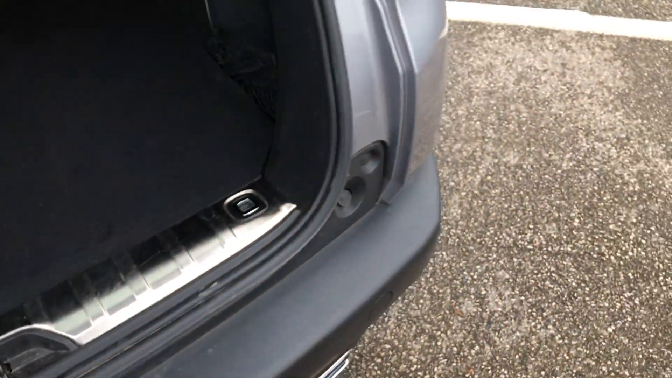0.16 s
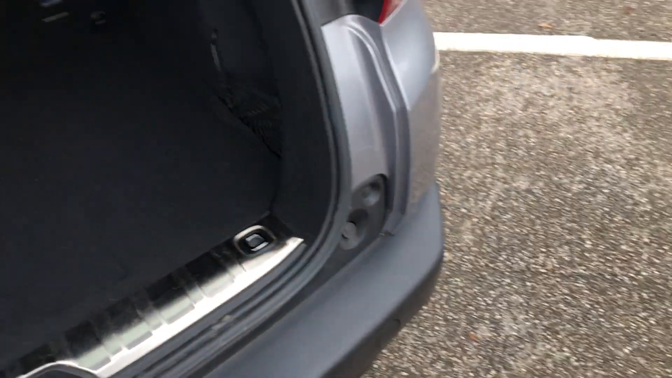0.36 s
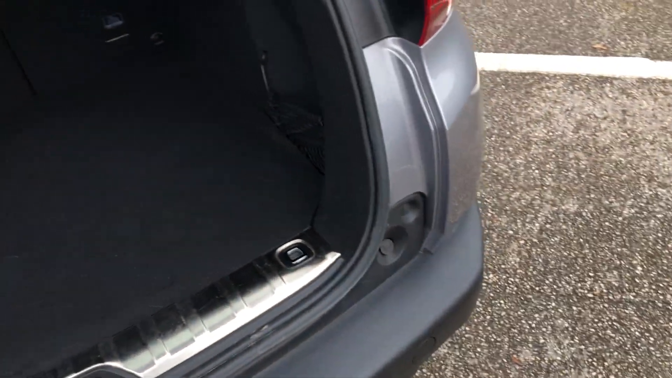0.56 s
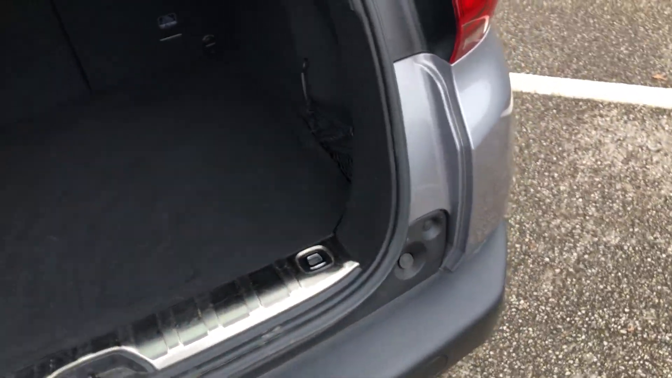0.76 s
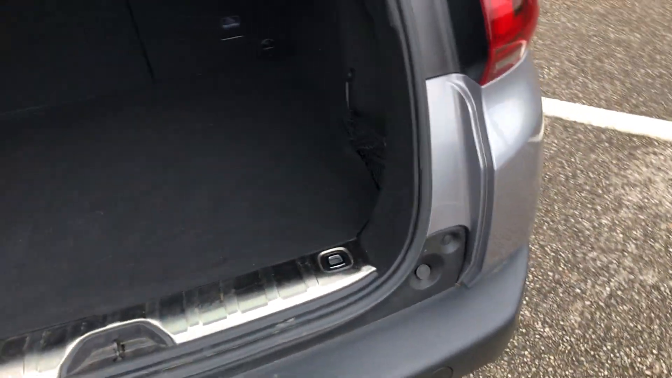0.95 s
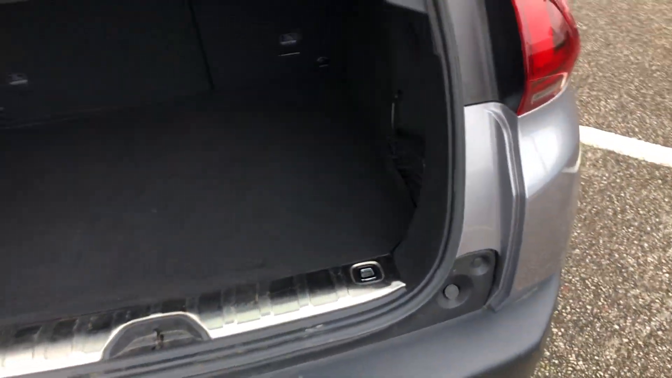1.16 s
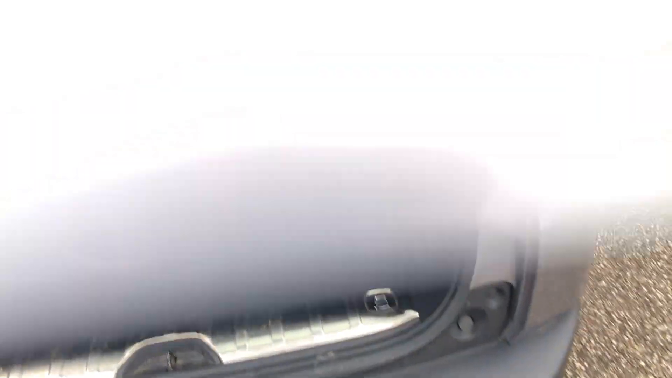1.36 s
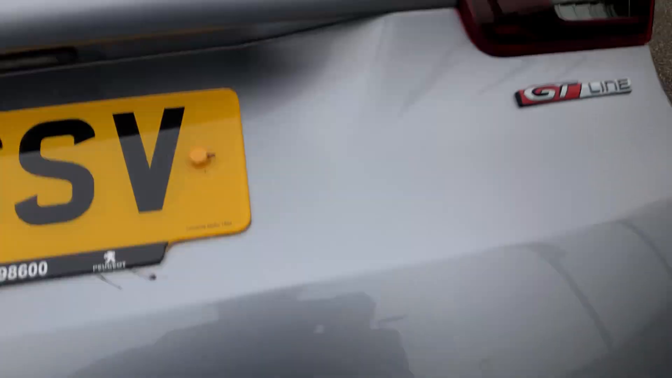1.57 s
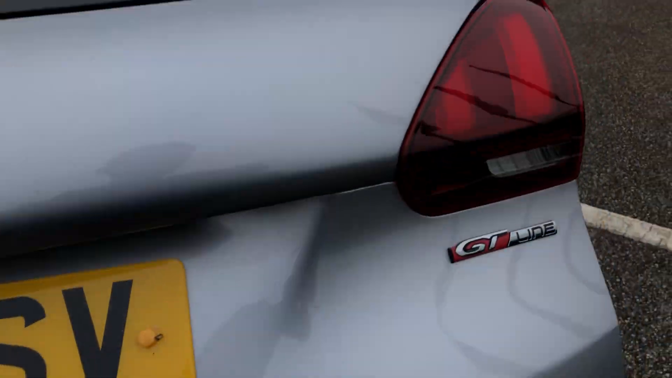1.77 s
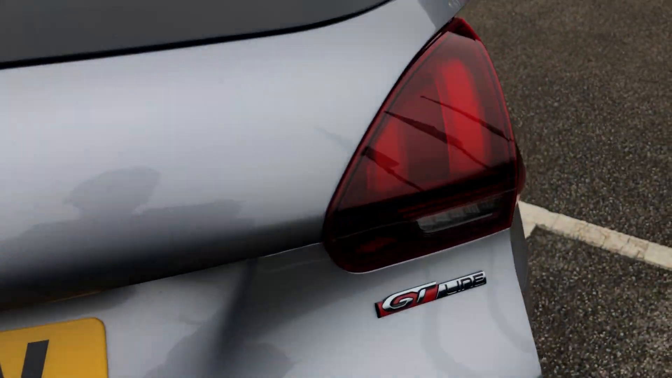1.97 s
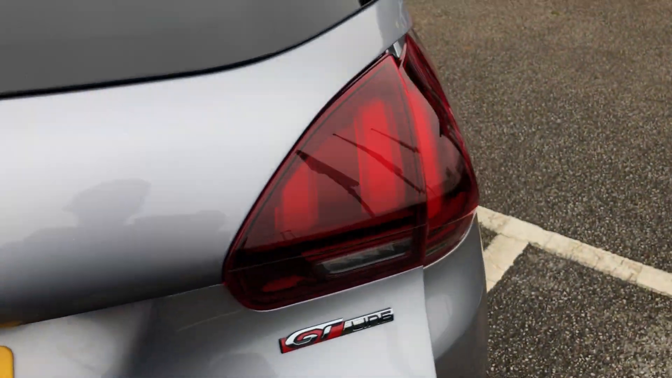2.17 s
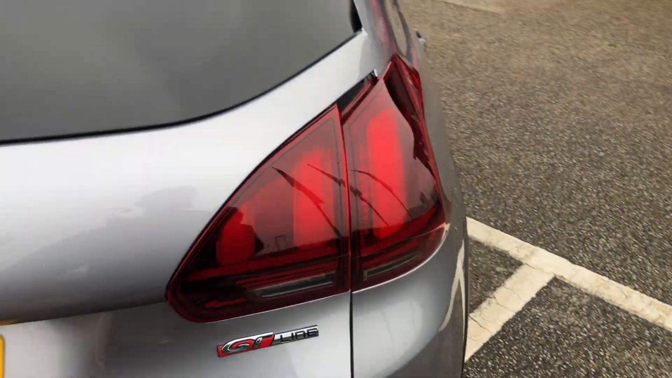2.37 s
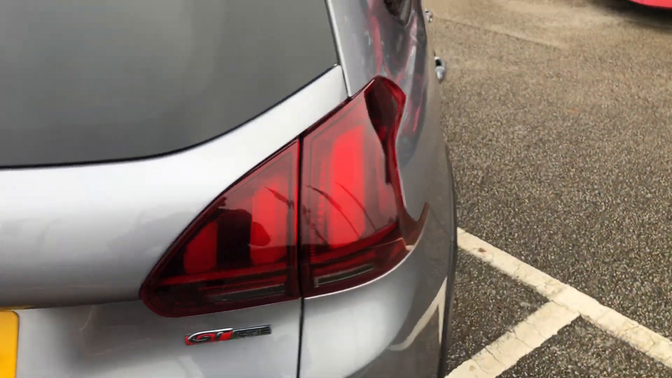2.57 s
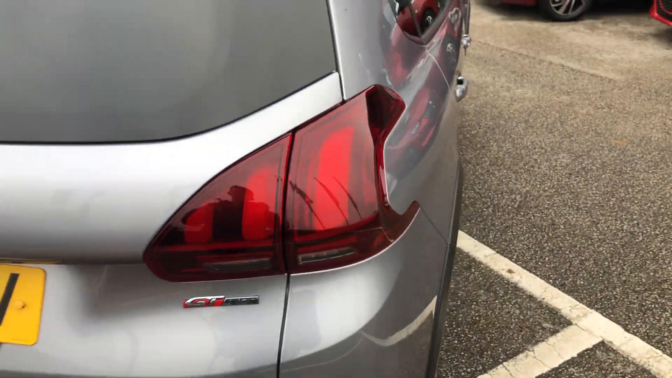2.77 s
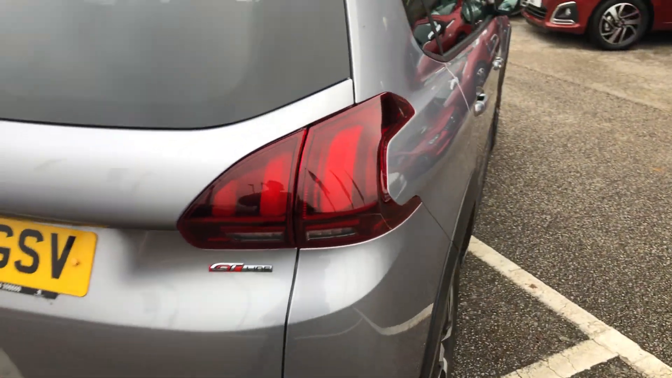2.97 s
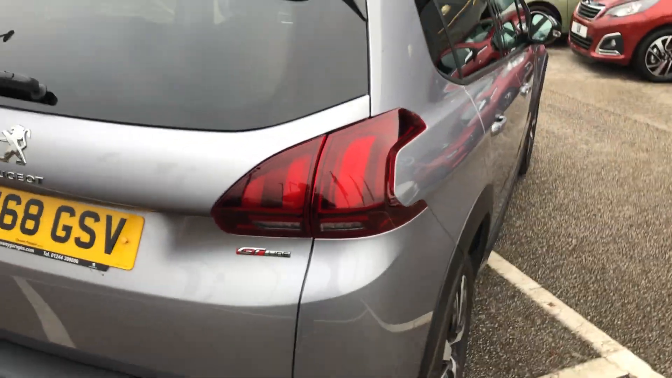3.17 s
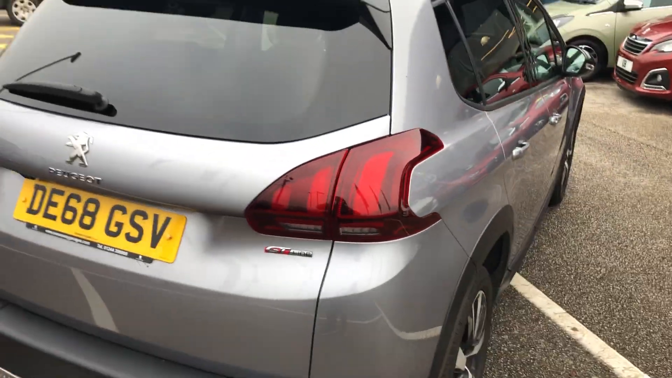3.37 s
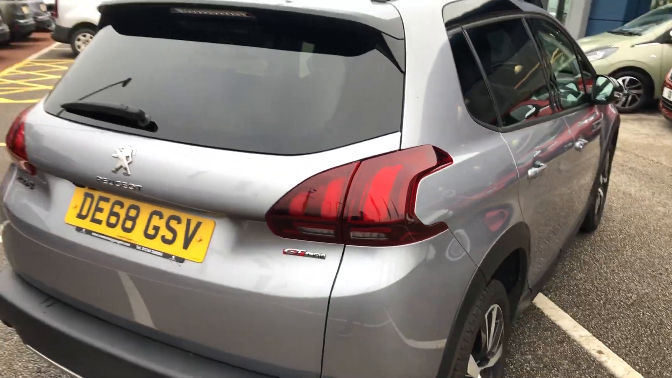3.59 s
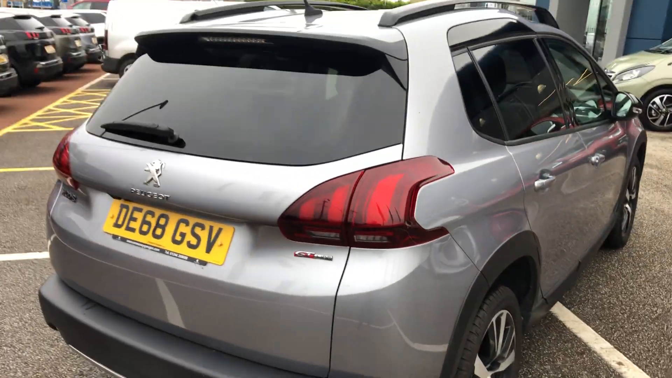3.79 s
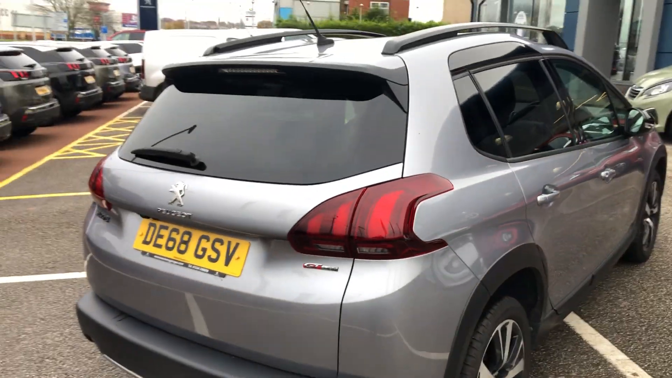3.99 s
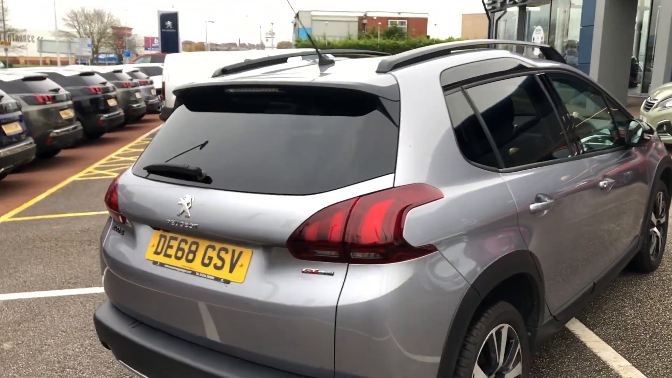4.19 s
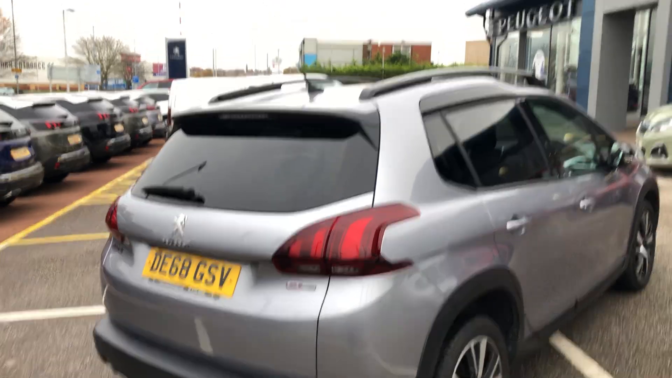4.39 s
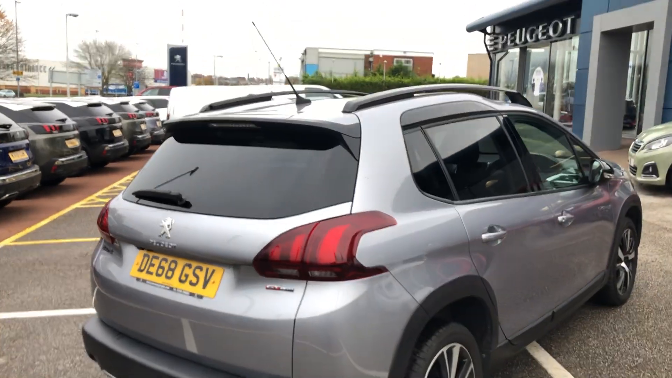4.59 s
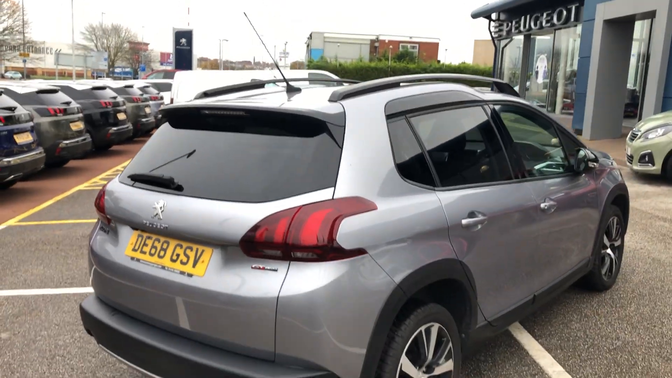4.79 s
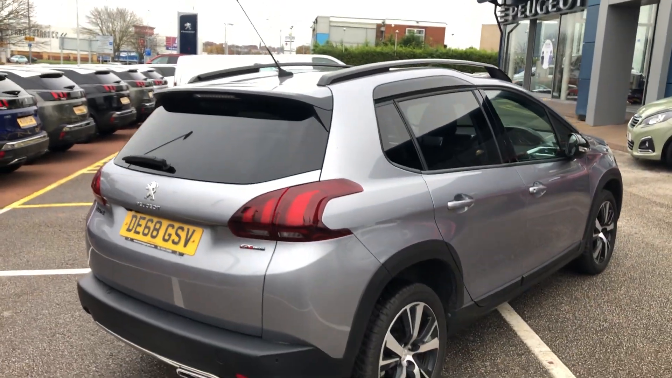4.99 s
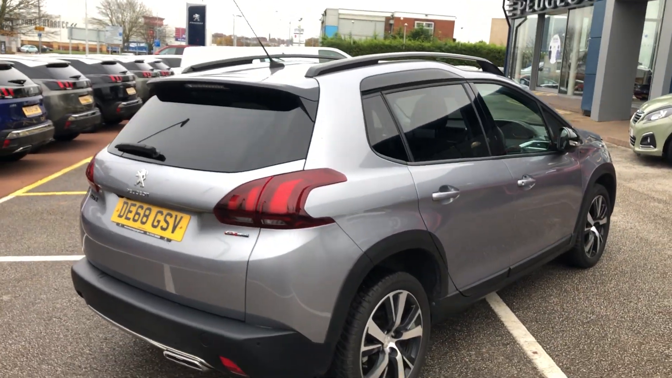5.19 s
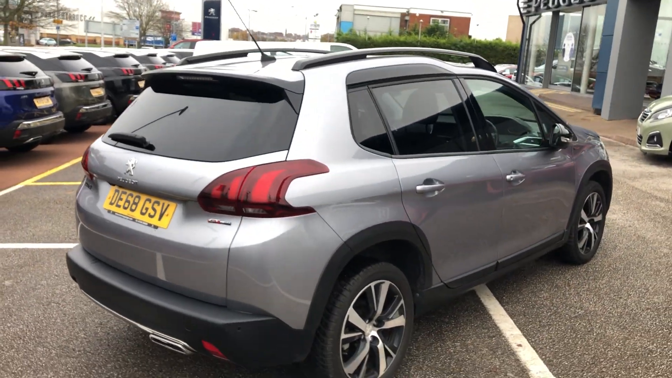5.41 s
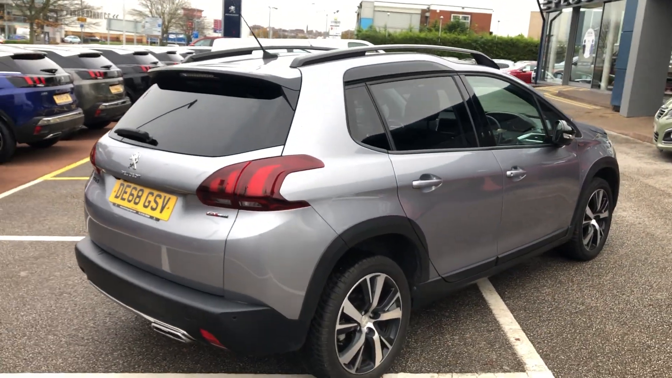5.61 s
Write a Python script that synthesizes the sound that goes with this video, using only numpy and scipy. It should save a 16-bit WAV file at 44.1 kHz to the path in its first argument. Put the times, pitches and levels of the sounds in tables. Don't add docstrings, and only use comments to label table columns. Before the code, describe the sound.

Close handheld perspective beside a hatchback: soft knocks and cloth movement, a thin airy hiss as the lid is pulled, low wind-like puffs, then one loud slam with metallic latch clatter and deep body boom. Afterwards gritty steps tick nearby, while steady road rumble and a very faint, spurting air leak continue.

```python
import sys
import numpy as np
from scipy import signal
from scipy.fft import rfft, irfft
from scipy.io import wavfile
from scipy.ndimage import uniform_filter1d

SR = 44100
rng = np.random.default_rng(int(sys.argv[2]) if len(sys.argv) > 2 else 0)


def output_pcm(signal):
    pcm = np.clip(np.atleast_2d(signal).T, -1, 1) * 32767
    wavfile.write(sys.argv[1], SR, np.round(pcm).astype(np.int16))


def natural_amplitude(level_db):
    exponent = np.asarray(level_db, float) / 20
    return 10 ** exponent


N = 249165
STEP_BACK_S = 3.05


def colour_gain(f, points):
    hz, db = np.transpose(points)
    return natural_amplitude(np.interp(np.log(f), np.log(hz), db))


def shaped(points):
    hz, db = np.transpose(points)
    f = np.maximum(np.fft.rfftfreq(N, 1 / SR), 1)
    gain = natural_amplitude(np.interp(np.log(f), np.log(hz), db, left=-90))
    x = irfft(rfft(rng.standard_normal(N)) * gain, N)
    return x / x.std()


def lowpass(x, order, hz):
    return signal.lfilter(*signal.butter(order, hz, fs=SR), x)


def band(x, hz, width):
    quality = max(hz / width, .3)
    return signal.lfilter(*signal.iirpeak(min(hz, .4 * SR), quality, fs=SR), x)


def walk(rate):
    hold = int(SR / rate)
    x = np.repeat(rng.standard_normal(N // hold + 1), hold)
    x = uniform_filter1d(uniform_filter1d(x, hold), hold)[:N]
    return x / x.std()


def curves(table):
    s, *columns = np.transpose(table)
    return [np.interp(np.arange(N) / SR, s, column) for column in columns]


def swells(rows):
    s, db, rise, fall = np.transpose(rows)[:, :, None]
    steps = np.arange(0, N / SR + .002, .002)
    t = steps - s
    drop_db = 20 * np.where(t < 0, -t / rise, t / fall)
    level = np.sqrt(np.sum(natural_amplitude(db - drop_db) ** 2, axis=0))
    return np.interp(np.arange(N) / SR, steps, level)


def burst(hold_ms, t60_ms):
    t = np.arange(SR // 4) / SR * 1000
    return np.minimum(t / 0.1, 1) * natural_amplitude(-60 * np.maximum(t - hold_ms, 0) / t60_ms)


def add(out, x, s):
    i = int(s * SR)
    out[i:i + len(x)] += x[:N - i]


def whistle(hz, width):
    noise = rng.standard_normal(N) + 1j * rng.standard_normal(N)
    sway = signal.sosfilt(signal.butter(2, width / 2, fs=SR, output="sos"), noise)
    x = np.real(sway * np.exp(2j * np.pi * np.cumsum(hz) / SR))
    return x / x.std()


def rubs(table, grain_db, snap_ms, linger, longest_ms):
    out = np.zeros(N)
    noises = rng.standard_normal((len(table), 2, SR // 4))
    for (s, db, low_hz, high_hz, rub_ms), (noise, grain) in zip(table, noises):
        edges = [low_hz, np.clip(high_hz, 1.2 * low_hz, .45 * SR)]
        t60_ms = min(snap_ms + linger * rub_ms, longest_ms)
        x = noise * natural_amplitude(grain_db * grain) * burst(rub_ms, t60_ms)
        x = signal.lfilter(*signal.butter(2, edges, "bandpass", fs=SR), x)
        x = lowpass(x, 1, min(0.86 * low_hz, .45 * SR))
        add(out, natural_amplitude(db) * x / np.abs(x).max(), s)
    return out


def rings(table):
    out, t = np.zeros(N), np.arange(SR) / SR
    for s, db, hz, t60, cycles in table:
        push = np.sin(np.pi / 2 * np.minimum(t * hz / cycles, 1)) ** 2
        add(out, natural_amplitude(db - 60 * t / t60) * push * np.sin(2 * np.pi * hz * t), s)
    return out


def traffic():
    # (time [s], tyre roar [dB])
    road = [
        (0, -53.5),
        (.5, -54.5),
        (1.15, -53.5),
        (2.0, -54.5),
        (2.5, -54.5),
        (3.4, -53),
        (4.3, -52.5),
        (4.5, -51.5),
        (5.65, -51),
    ]
    # (frequency [Hz], density [dB per Hz])
    roar_colour = [(76, -30), (130, -1.5), (150, -0.5), (337, -3.5), (396, -7.5), (643, -8), (742, -9),
                   (904, -4), (1140, -8.5), (1610, -11), (6630, -40.5), (8080, -38), (9500, -46),
                   (12400, -78), (20900, -120)]
    # (frequency [Hz], density [dB per Hz])
    rumble_colour = [(20, -40), (32, -10), (50, 13), (70, 7), (110, 5), (160, -12.5), (260, -41)]
    # (time [s], peak [dB], rise [s for 20 dB], fall [s for 20 dB])
    engines = [(0, -48, 1, .5), (.3, -50, .2, .6), (.62, -51, .2, 1.5), (1.3, -50, .4, 1.2),
               (1.78, -50, .6, .3), (2.0, -52, .1, .1), (2.38, -52, .6, .3), (2.95, -50, 1.2, .4),
               (3.4, -49, .5, 1.2), (4.11, -50.5, .6, .3), (4.48, -47, .5, 1.2), (4.97, -46, .2, .5),
               (5.55, -47, 2.6, 1)]
    idle_db, flicker_db = -57.5, .8
    roar_db, = curves(road)
    centres = 100 * 2 ** np.arange(0, 8, .5)
    f, spectrum = np.fft.rfftfreq(N, 1 / SR), rfft(shaped(roar_colour))
    roar = np.zeros(N)
    for row in np.eye(len(centres)):
        part = irfft(spectrum * np.interp(f, centres, row), N)
        roar += natural_amplitude(flicker_db * walk(7.1)) * part
    rumble = np.hypot(swells(engines), natural_amplitude(idle_db)) * shaped(rumble_colour)
    return natural_amplitude(roar_db + 4) * roar + rumble


def strut_flow():
    # (time [s], flow [dB], whistle [Hz], upper whistle [Hz])
    flow = [
        (0.878, -90, 7500, 10000),
        (0.97, -67, 7700, 10100),
        (1.03, -61.5, 8200, 10400),
        (1.085, -60, 8600, 10900),
        (1.186, -57, 7800, 11400),
        (1.27, -60, 7500, 11700),
        (1.38, -64, 7900, 11700),
        (1.516, -69, 8000, 11500),
        (1.76, -73, 7600, 11000),
        (1.88, -88, 7500, 11000),
    ]
    flow_db, low_hz, top_hz = curves(flow)
    moving = np.arange(N) / SR < flow[-1][0]
    return natural_amplitude(flow_db) * moving, low_hz, top_hz


def gas_whistles(flow, strut_hz, strut_top_hz):
    # (time [s], peak [dB], fall [s for 20 dB])
    spurts = [(2.14, -72, .2), (2.5, -73, .9), (3.14, -68, .25), (3.4, -71, .3), (3.67, -69, .25),
              (3.9, -68.5, .4), (4.18, -66, .35), (4.45, -66, 1.2), (4.77, -67, .9), (5.05, -66, 1.2),
              (5.25, -66, 1.2), (5.42, -65, .9)]
    # (time [s], peak [dB], fall [s for 20 dB])
    answers = [
        (2.14, -73, .2),
        (4.0, -74, .3),
        (4.3, -72, .3),
        (4.58, -76, .3),
        (4.93, -72, .5),
        (5.22, -72, .6),
        (5.5, -69.5, .6),
    ]
    rise_s, leak_hz, leak_top_hz = .15, 7950, 10900
    sag_hz_per_s, sag_from_s = -300, 4.2
    pull_s, top_fade_db_per_s = 1.04, -35
    t = np.arange(N) / SR
    pulled, near = np.maximum(t - pull_s, 0), t < STEP_BACK_S
    sag_hz = sag_hz_per_s * np.maximum(t - sag_from_s, 0)
    low_hz = np.where(near, strut_hz, leak_hz + sag_hz)
    top_hz = np.where(near, strut_top_hz, leak_top_hz + 1.5 * sag_hz)
    leak = swells([(s, db, rise_s, fall) for s, db, fall in spurts])
    leak_top = swells([(s, db, rise_s, fall) for s, db, fall in answers])
    low = np.hypot(natural_amplitude(4.6 - 5.1 * pulled) * flow, leak)
    top = np.hypot(natural_amplitude(2.6 + top_fade_db_per_s * pulled) * flow, leak_top)
    low = low * natural_amplitude(-5.5 + 2.5 * walk(40)) * whistle(low_hz + 70 * walk(20), 850)
    top = top * natural_amplitude(-4.4 + 2.1 * walk(28)) * whistle(top_hz + 150 * walk(11), 1200)
    return low + top


def cloth_and_rush(flow):
    # (frequency [Hz], density [dB per Hz])
    fine_colour = [(4000, -25), (6000, -8), (9000, -5), (13000, -5), (16000, -3)]
    # (time [s], peak [dB], rise [s for 20 dB], fall [s for 20 dB], coarse over fine [dB])
    moves = [(.1, -66, 2, .3, -1), (1.23, -70, .3, .3, 6), (1.58, -69, .5, .2, -4),
             (1.66, -75, .15, .15, 12), (1.92, -70, .06, .3, -5), (2.12, -70, .5, .2, 8.5),
             (2.45, -76, .15, .15, 11), (2.75, -72, .3, .6, 1), (2.93, -70, .3, .15, 3),
             (3.34, -73, .1, .08, 3), (3.2, -84, .3, .2, 9), (3.72, -75.5, .25, .2, -3),
             (4.4, -84, .3, .3, 10), (5.5, -85, .4, .6, 11)]
    stir_db, step_back_db, lot_hiss_db, rush_db = -76, -24, -72, -1
    t = np.arange(N) / SR
    stir = natural_amplitude(stir_db + step_back_db * np.clip((t - STEP_BACK_S) / .2, 0, 1))
    fine = swells([row[:4] for row in moves])
    fine = np.sqrt(fine ** 2 + stir ** 2 + (natural_amplitude(rush_db) * flow) ** 2)
    rough = swells([(s, db + over_db, rise, fall) for s, db, rise, fall, over_db in moves])
    rough = np.hypot(rough, natural_amplitude(lot_hiss_db))
    coarse = band(band(rng.standard_normal(N), 3830, 3200), 3830, 3200)
    coarse = lowpass(coarse, 2, 9500)
    rustle = natural_amplitude(5.5) * fine * shaped(fine_colour) + natural_amplitude(2.5) * rough * coarse / coarse.std()
    return natural_amplitude(0.89 * walk(40)) * rustle


def hiss():
    flow, strut_hz, strut_top_hz = strut_flow()
    return gas_whistles(flow, strut_hz, strut_top_hz) + cloth_and_rush(flow)


def hands_and_shoes():
    # (time [s], peak
    # [dB], low edge [Hz], high edge [Hz])
    tick_table = [(.538, -45.5, 5000, 16000), (.665, -56, 9000, 16000), (.784, -54, 3000, 5500),
                  (2.172, -46, 1990, 6040), (2.21, -50, 4500, 10000), (2.217, -48.5, 4400, 5600),
                  (2.227, -51, 7000, 16000), (2.43, -60, 5000, 10100), (2.4415, -50, 6000, 14000),
                  (2.445, -52, 3000, 8000), (2.689, -45, 5000, 16000), (2.701, -45, 5000, 16000),
                  (2.9705, -46, 3000, 7000), (2.972, -54, 5000, 15000), (3.319, -46, 2000, 11000),
                  (3.338, -48, 2500, 15000), (3.357, -48, 4500, 10000), (3.459, -55, 3000, 14000),
                  (3.576, -58, 8000, 15000), (.207, -54, 4000, 9000), (.207, -56, 12000, 16000),
                  (.543, -52, 4000, 11000), (3.312, -44, 3200, 5500), (3.338, -46, 3200, 6000),
                  (2.246, -55, 5000, 6000)]
    # (time [s], peak [dB], low edge [Hz], high edge [Hz], rub [ms])
    scuffs = [(.533, -39, 890, 3200, 8.9), (.54, -38, 247, 670, 20), (.827, -44, 2400, 15000, 7.4),
              (1.088, -36.5, 396, 3300, 26), (1.122, -33.5, 520, 2870, 18), (1.45, -36, 90, 457, 206),
              (2.13, -39, 198, 496, 42), (2.23, -41, 300, 900, 18), (1.91, -56, 13500, 16000, 60),
              (2.03, -58, 13500, 16000, 140), (2.246, -48, 11000, 16000, 4.6),
              (2.924, -44, 4500, 12000, 3.5), (3.19, -58, 8600, 14800, 4.6), (3.299, -38, 400, 2200, 46),
              (1.29, -43, 200, 420, 90), (3.333, -33, 308, 1400, 4.2), (3.31, -57, 12000, 16000, 35),
              (3.626, -53, 11000, 16000, 23)]
    # (time [s], peak [dB], pitch [Hz], t60 [s], push
    clicks = [(.536, -37.5, 1310, 0.025, 1.8), (1.128, -36, 1400, .05, 3), (1.138, -41, 1140, 0.14, 4.4),
              (2.2822, -36, 3420, 0.01, .5), (2.283, -35, 2660, 0.0093, .5), (3.2995, -33, 890, 0.032, .8),
              (3.3125, -26, 1100, 0.01, .6), (3.3122, -45, 4200, .01, .6), (3.319, -35.5, 743, .06, 1.2),
              (3.3195, -40, 2700, .008, 1.5), (3.3335, -35, 2820, 0.009, 1.5),
              (3.34, -26, 850, 0.015, 0.59), (3.347, -29, 1650, 0.012, 1), (3.3567, -29, 2900, 0.008, 1.5),
              (3.358, -20, 910, 0.013, 1.5), (3.381, -45, 2900, .012, .8), (3.382, -34, 950, 0.025, 0.64),
              (4.319, -43, 3400, 0.009, .6), (4.321, -30, 450, 0.013, .4), (1.086, -42, 820, .03, 1.5),
              (1.094, -48, 3900, .02, 3), (1.097, -43, 1950, .02, 2), (1.11, -43, 1250, .02, 2),
              (1.123, -41, 2050, .03, 3), (1.126, -44, 2650, .08, 6), (1.133, -40, 2000, .025, 2),
              (1.133, -41, 750, .04, 2), (1.142, -42, 500, .06, 2), (3.304, -39, 1400, .025, 2),
              (3.309, -36, 950, .02, 1), (3.325, -37, 620, .05, 1.5), (3.334, -35, 500, .02, .8),
              (.531, -46, 2700, .03, 4), (.5362, -35, 1700, .012, .5), (2.1735, -45, 2350, .015, 2),
             (2.2825, -42, 5000, .005, 1), (2.4393, -43, 4500, .005, .5), (2.4418, -38, 5000, .008, .5),
             (2.4418, -43, 8000, .008, 1), (2.4425, -45, 3200, .01, 1), (2.4579, -30, 1600, .009, 1),
             (2.458, -44, 3000, .006, .5), (2.458, -50, 5500, .005, 1), (2.9218, -42, 1500, .004, .4),
             (2.927, -45, 4900, .015, 4), (2.9703, -37, 1550, .012, 1), (2.9728, -36, 3300, .007, .5),
             (2.9745, -46, 3900, .015, 2), (2.975, -50, 6300, .01, 3), (1.63, -55, 4200, .1, 20),
             (1.645, -52, 4000, .06, 10)]
    tick_ms = 1.6
    table = scuffs + [(*row, tick_ms) for row in tick_table]
    return rings(clicks) + rubs(table, grain_db=0.5, snap_ms=16, linger=3.6, longest_ms=75)


def puffs(droop=0.26):
    # (time [s], peak [dB], swing [Hz], length [cycles])
    reach = [
        (.551, -39, 173, 1.3),
        (0.557, -35, 172, 1.2),
        (0.591, -43, 250, 2),
        (0.811, -42, 302, 3.3),
        (0.901, -41, 196, 5),
        (.96, -39, 220, 2),
        (1.10, -40.5, 163, 3.6),
    ]
    # (time [s], peak [dB], swing [Hz], length [cycles])
    swing = [ (1.44, -34, 143, 1.4), (1.467, -32, 151, 1.3), (1.504, -30.5, 248, 2.3),
             (1.533, -40, 180, 1.4), (1.555, -22.5, 195, 1.5), (1.567, -31, 300, 1.2),
             (1.573, -24.5, 117, 1.6), (1.601, -25.5, 196, 2.7), (1.601, -30, 460, 5.4),
             (1.619, -29, 143, 3), (1.649, -30, 111, 2.1), (1.6, -37, 60.4, 3.4), (1.689, -38, 91, 2.2),
             (1.76, -37, 147, 2.4), (1.838, -40, 135, 2)]
    # (time [s], peak [dB], swing [Hz], length [cycles])
    push = [
        (2.166, -35, 158, 1.2),
        (2.183, -32.5, 83, 1.8),
        (2.204, -36, 131, 2.7),
        (2.225, -38, 120, 1.8),
        (2.241, -40.5, 326, 5.9),
        (2.349, -43, 70, 3.2),
        (3.19, -42, 264, 4.6),
        (3.459, -38.5, 232, 3.3),
        (4.449, -46.5, 99, 2.1),
        (4.95, -50, 200, 3),
    ]
    out, eddies = np.zeros(N), reach + swing + push
    for (s, db, hz, cycles), turn in zip(eddies, rng.random((len(eddies), 1))):
        u = np.arange(-1.5, 1.5, hz / cycles / SR)
        swings = cycles * (u - droop * u ** 2) + turn
        x = natural_amplitude(db) * np.exp(-4 * u ** 2) * np.cos(2 * np.pi * swings)
        add(out, x, s - 1.493 * cycles / hz)
    return out


def latch_and_panel():
    # (time [s], strength [dB], chatter [ms], fade t60 [ms], dull above [Hz])
    contacts = [
        (2.5705, -29, 1.8, 26, 6000),
        (2.5693, -20.5, 11, 33, 1410),
        (2.581, -12, 5.7, 5.6, 5800),
        (2.587, -16, 10.7, 34, 11800),
        (2.602, -23.5, 9.3, 82, 5160),
        (2.628, -28.5, 13, 57, 2840),
        (2.648, -36, 5.3, 110, 4000),
        (2.685, -42, 22, 55, 9700),
    ]
    # (pitch [Hz], level [dB], t60 [s])
    metal = [(512, 1, .05), (811, 9, 0.045), (877, 4, 0.055), (1013, 8.5, 0.023), (1100, -8, 0.093),
             (1316, -6, 0.046), (1715, -5, 0.056), (2005, -3, 0.049), (2340, -6, .04), (2630, -4, .04),
             (3200, -7, .04), (3630, -12, 0.038), (4440, -12, 0.033)]
    # (frequency [Hz], gain [dB])
    sizzle = [(700, -14), (1300, -8), (2000, -3), (4000, -3.5), (5200, -15), (6500, -19), (9500, -15),
              (13000, -11), (16000, -5)]
    # (time [s], peak [dB], pitch [Hz], t60
    # [s], push [cycles])
    booms = [(2.5703, -25, 1020, 0.014, 0.3), (2.585, -12, 275.7, 0.11, 0.81), (2.599, -12, 63.5, .15, .17),
             (2.6148, -19, 66, .08, .4), (2.584, -23, 505, .07, 1.5), (2.586, -24, 392, .08, 1.5),
             (2.583, -19, 830, .07, 1.5), (2.655, -28, 95, .2, 1.2), (2.68, -29, 72.8, 0.69, 6.3),
             (2.5705, -22, 1300, .008, .4), (2.5755, -25, 900, .012, .5), (2.594, -38, 9500, .02, 8),
             (2.601, -26, 3700, .05, 4), (2.5875, -22, 3800, .012, 2), (2.608, -26, 420, .08, 2),
             (2.628, -16, 300, .018, .4), (2.64, -30, 300, .08, 2), (2.665, -33, 185, .3, 2),
             (2.692, -31, 335, .1, 3), (2.695, -36, 480, .06, 3), (2.725, -35, 88, .3, 1.5),
             (2.79, -42, 190, .2, 2), (2.885, -41, 280, .08, 2)]
    force = np.zeros(N)
    noises = rng.standard_normal((len(contacts), 2, SR // 4))
    for (s, db, hold_ms, t60_ms, dull_hz), (noise, grain) in zip(contacts, noises):
        chatter = noise * natural_amplitude(3.7 * grain) * burst(hold_ms, t60_ms)
        add(force, natural_amplitude(db) * lowpass(chatter, 2, min(dull_hz, .4 * SR)), s)
    ringing = np.zeros(N)
    for hz, db, t60 in metal:
        ringing += natural_amplitude(db) * band(force, hz, 2.46 / t60) * np.sqrt(t60 * 100)
    f = np.fft.rfftfreq(N, 1 / SR) + 1
    direct = irfft(rfft(force) * colour_gain(f, sizzle), N)
    return natural_amplitude(-6) * ringing + direct + rings(booms)


def shudder():
    # (time [s], peak [dB], low edge [Hz], high edge [Hz], hold [ms])
    table = [
        (2.605, -20, 200, 600, 32),
        (2.65, -36, 59.7, 198, 91),
        (2.685, -30, 150, 490, 19),
        (2.5818, -25, 9100, 16000, 2.8),
        (2.583, -11, 1800, 4500, 1.9),
        (2.601, -43.5, 7000, 16000, 40),
        (2.631, -39, 6000, 14100, 4.1),
    ]
    return rubs(table, grain_db=2, snap_ms=1.5, linger=5.2, longest_ms=520)


def yard(hit):
    t60_s, level_db = 0.21, -21.5
    t = np.arange(SR) / SR
    tail = rng.standard_normal(SR) * natural_amplitude(-60 * t / t60_s) * np.minimum(t / 0.026, 1)
    tail = lowpass(tail, 1, 2500)
    tail /= np.sqrt(np.sum(tail ** 2))
    return natural_amplitude(level_db) * signal.fftconvolve(hit, tail)[:N]


def scene():
    hit = latch_and_panel() + shudder()
    mix = traffic() + hiss() + hands_and_shoes() + puffs() + hit + yard(hit)
    return mix[None]


def top_cut(x):
    return signal.sosfilt(signal.butter(12, 16640, fs=SR, output="sos"), x)


def record(dry):
    # (frequency [Hz], density [dB per Hz])
    mic_hiss = [(3000, -10), (6000, 6), (16000, -16)]
    hiss_db, bass_hz, top_hz = -82, 35, 15750
    x = dry + natural_amplitude(hiss_db) * shaped(mic_hiss)
    x = signal.sosfilt(signal.butter(2, bass_hz, "highpass", fs=SR, output="sos"), x)
    x = np.tanh(1.797 * x) / 1.823
    x = signal.sosfilt(signal.ellip(10, .2, 60, top_hz, fs=SR, output="sos"), x)
    return top_cut(x)


dry = scene()
out = record(dry)
output_pcm(out)
```